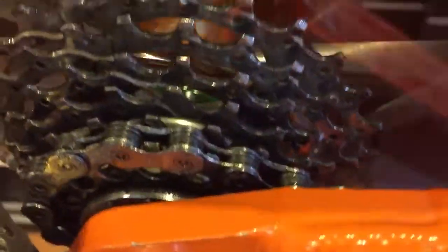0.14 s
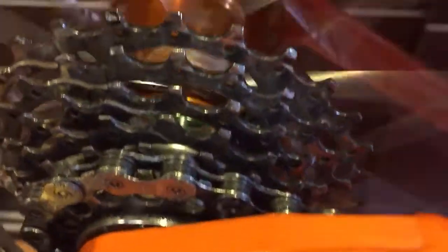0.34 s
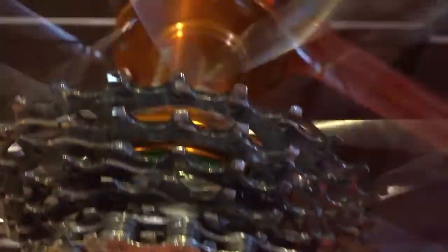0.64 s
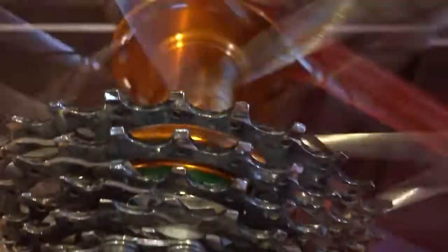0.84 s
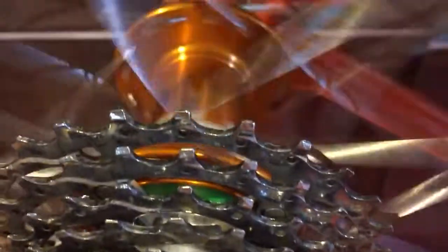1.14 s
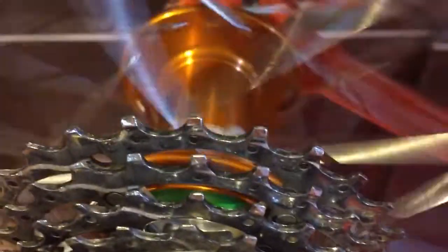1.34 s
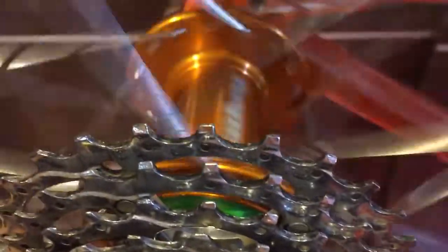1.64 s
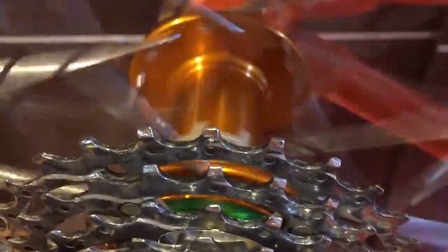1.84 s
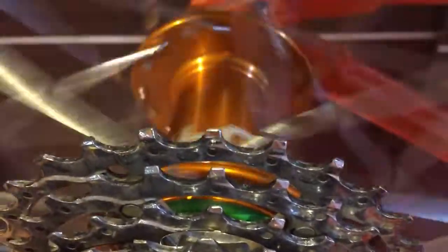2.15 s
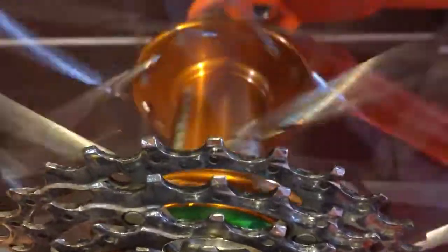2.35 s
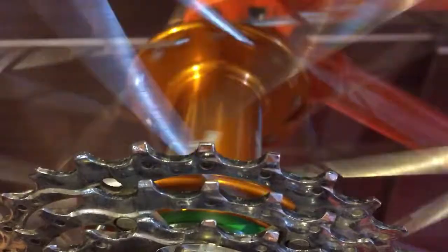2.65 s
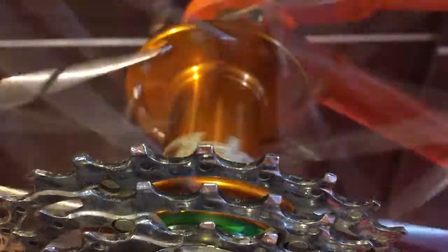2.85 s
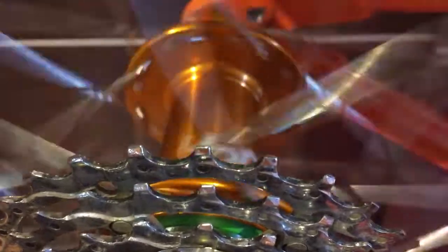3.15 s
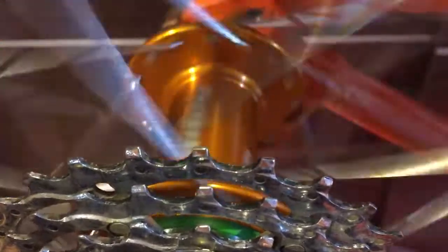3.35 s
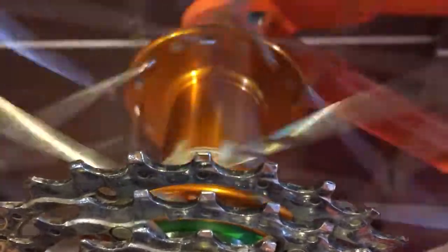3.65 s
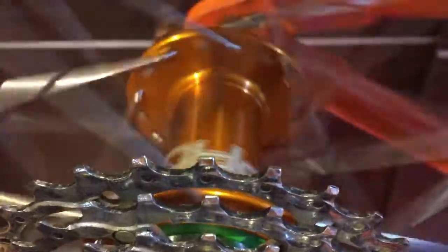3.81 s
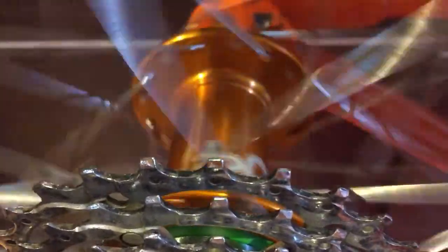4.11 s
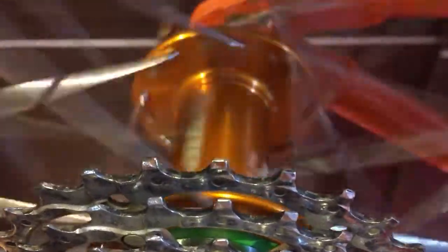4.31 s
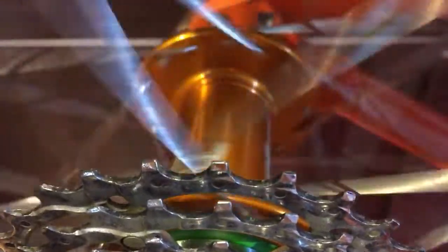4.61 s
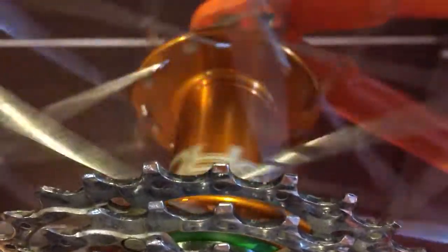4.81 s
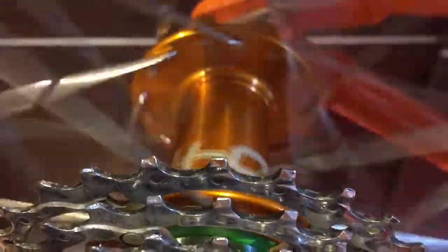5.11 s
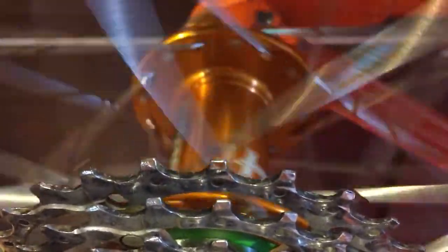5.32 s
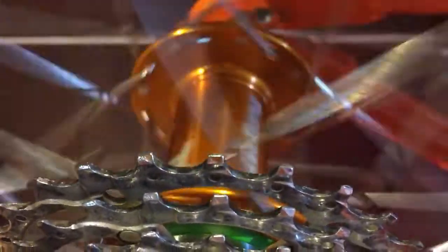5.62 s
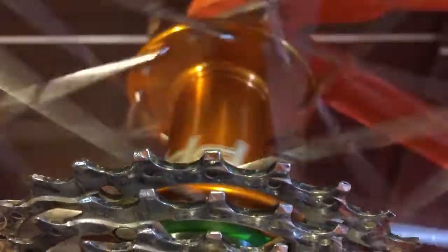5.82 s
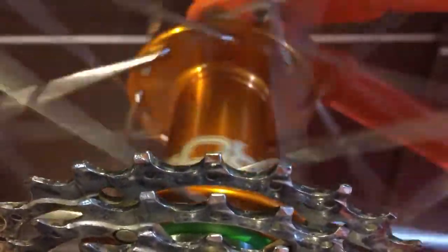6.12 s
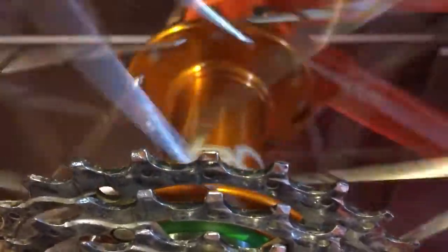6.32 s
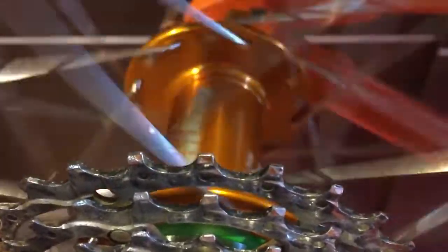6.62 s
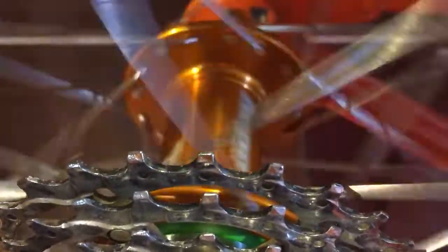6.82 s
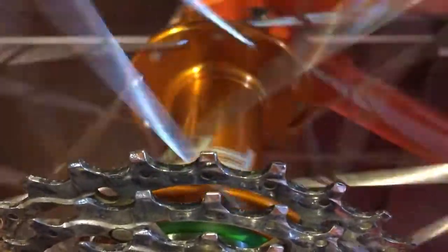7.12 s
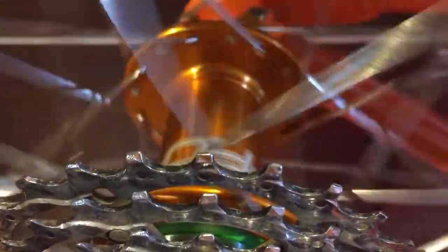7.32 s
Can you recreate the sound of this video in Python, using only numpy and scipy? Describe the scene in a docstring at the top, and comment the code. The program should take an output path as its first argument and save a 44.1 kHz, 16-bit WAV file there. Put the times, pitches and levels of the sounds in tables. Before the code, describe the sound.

Heard very close to the hub indoors, a bicycle rear wheel coasts freely. Sharp, bright ratchet clicks come in uneven pairs, so fast they fuse into a raspy metallic buzz. The rate sinks smoothly to a little over half, making the buzz lower and more granular, while loudness stays nearly steady. Thin metallic ringing and a light low thump accompany the clicks; tone ripples with each wheel turn. It is still ticking at the end.

```python
"""Coasting bicycle wheel

A bicycle rear wheel coasts and slows down, heard from close to the hub, indoors. Two pairs of pawls drop
off a ring of 44 teeth, one pair a little after the other. Each drop is a click: filtered noise bursts make
its crack, resonators ring axle and spokes, and low filters thump the frame. The pattern repeats with
every turn of the wheel, over a faint dull noise."""
import sys
import numpy as np
from scipy import signal
from scipy.fft import rfft, irfft
from scipy.io import wavfile
from scipy.ndimage import uniform_filter1d

SR = 44100
rng = np.random.default_rng(int(sys.argv[2]) if len(sys.argv) > 2 else 0)


def inscribe(sig):
    """Save sig as 16-bit PCM at rate SR to the path in sys.argv[1].

    A 1-D sig is mono; a 2-D sig holds one channel per row.
    Samples are clipped to [-1, 1] before scaling.
    """
    pcm = np.round(np.clip(np.atleast_2d(sig).T, -1, 1) * 32767)
    wavfile.write(sys.argv[1], SR, pcm.astype(np.int16))


N = 328986  # length in samples
TEETH = 44  # teeth in one turn of the wheel


def from_db(db):
    """Level in dB as an amplitude factor."""
    return 10 ** (np.asarray(db) / 20)


def rms_one(x):
    """Scale to an RMS of 1."""
    return x / np.sqrt(np.mean(x ** 2) + 1e-20)


def at_hz(points, hz, axis=1):
    """Read a column of a table at a frequency, interpolating along log frequency."""
    points = np.array(points)
    return np.interp(np.log(hz), np.log(points[:, 0]), points[:, axis])


def passed_by(x, hz, kind, order=2):
    """Butterworth filter; the tiny offset keeps it clear of denormal numbers."""
    return signal.sosfilt(signal.butter(order, hz, kind, fs=SR, output="sos"), x + 1e-18)


def add(track, s, size):
    """Clicks at the given times; those outside are dropped."""
    at = np.round(s * SR).astype(int)
    inside = (at >= 0) & (at < N)
    np.add.at(track, at[inside], size[inside])


def ring(clicks, hz, t60):
    """A two-pole resonator: a unit click sets a sine of starting height 1 ringing, then dying away."""
    radius = from_db(-60 / (t60 * SR))
    step = 2 * np.pi * hz / SR
    return signal.lfilter([0, np.sin(step)], [1, -2 * radius * np.cos(step), radius ** 2], clicks + 1e-18)


def dying_noise(clicks, noise, t60):
    """Noise whose power jumps at each click and then dies away."""
    power_decay = from_db(-120 / (t60 * SR))
    power = signal.lfilter([1], [1, -power_decay], clicks ** 2 + 1e-18)
    return noise * np.sqrt(power)


def colour(x, spectrum, size=4096):
    """Causal filter with the given spectrum (minimum phase, by folding the cepstrum)."""
    hz = np.maximum(np.arange(size // 2 + 1) * SR / size, 1)
    cepstrum = irfft(np.log(from_db(at_hz(spectrum, hz))))
    cepstrum[1:size // 2] *= 2
    cepstrum[size // 2 + 1:] = 0
    response = irfft(np.exp(rfft(cepstrum)))
    return signal.fftconvolve(x, response)[:N]


# The slowing wheel: teeth per s at the start, bearing friction in teeth per s^2,
# drag as the share of the speed lost per s
START_SPEED, FRICTION, DRAG = 58.01806, 2.417697, .02185024
EARLY_S = .00025  # every drop is placed this much earlier
# Heavy spot on the rim. Cosine part, then sine part, of how far it carries the wheel ahead once a turn,
# in teeth at 40 teeth per s.
HEAVY_SPOT = (.0066, .038)
# Pawl pairs on a ring slightly off centre. Each row: offset, cosine and sine part of the shift once a turn,
# cosine and sine part of the shift twice a turn, all in teeth; a positive shift makes the drop earlier.
PAWL_PAIRS = [(2.0745, -.0033, .0093, .0042, .0024), (2.4705, .0084, -.0044, -.0037, -.0041)]
# The second pawl of each pair. Each row: mean lag in teeth, swing of the lag over a turn in teeth,
# tooth of most lag, random scatter in teeth, level in dB against the first pawl.
SECOND_PAWLS = [(-.004, .016, 5.0, .004, -6.0), (-.004, .014, 30.0, .004, -6.0)]


def drops():
    """Friction and drag slow the wheel; gives tooth numbers, each pair's two drop times and the speed."""
    t = np.arange(N + SR // 10) / SR
    speed = (START_SPEED + FRICTION / DRAG) * np.exp(-DRAG * t) - FRICTION / DRAG
    passed = np.cumsum(speed) / SR  # teeth gone by
    tooth = np.arange(-2, int(passed[-1]) - 2)
    angle = 2 * np.pi * tooth / TEETH
    waves = np.array([np.cos(angle), np.sin(angle), np.cos(2 * angle), np.sin(2 * angle)])
    times = []
    for (offset, *off_centre), (lag, swing, most, scatter, _) in zip(PAWL_PAIRS, SECOND_PAWLS):
        # the slower the wheel, the more gravity on the heavy spot sways its speed
        slowness = 40 / np.interp(tooth + offset, passed, speed)
        sway = slowness ** 2 * (HEAVY_SPOT @ waves[:2])
        first = tooth + offset - sway - off_centre @ waves
        second = first + lag + swing * np.cos(angle - 2 * np.pi * most / TEETH)
        second = second + scatter * rng.standard_normal(len(tooth))
        times.append(np.interp([first, second], passed, t) - EARLY_S)
    return tooth, times, speed[:N]


def strikes(times, pair_db):
    """One click track from both pawls of both pairs; pair_db holds a level for every tooth and pair."""
    track = np.zeros(N)
    for (first, second), pawl, db in zip(times, SECOND_PAWLS, pair_db):
        add(track, first, from_db(db))
        add(track, second, from_db(db + pawl[-1]))
    return track


AIR_HZ, AIR_DB = 140, -62.5  # low-pass corner, RMS level


def air():
    """A faint dull noise under everything: low-passed white noise."""
    return from_db(AIR_DB) * rms_one(passed_by(rng.standard_normal(N), AIR_HZ, "low"))


# Weak angles, each met twice a turn: the thump of pair 1, the thump of pair 2, the axle ring of pair 2.
# Each row: tooth, width in teeth, dip in dB.
THUMP_1_WEAK_ANGLES = [(11.1, 1.6, -9), (21.5, 1.2, -2)]
THUMP_2_WEAK_ANGLES = [(11.5, 2.2, -4.5), (21.8, 2.2, -5)]
AXLE_WEAK_ANGLES = [(9.7, 1.15, -15), (1.9, 1.8, -8)]


def around(tooth):
    """Level in dB of both thumps and the axle ring at each tooth: a bell-shaped dip at every weak angle."""
    half, levels = TEETH / 2, []
    for dips in (THUMP_1_WEAK_ANGLES, THUMP_2_WEAK_ANGLES, AXLE_WEAK_ANGLES):
        at, width, dip_db = np.transpose(dips)
        apart = (tooth[:, None] - at + half / 2) % half - half / 2
        levels.append(np.exp(-.5 * (apart / width) ** 2) @ dip_db)
    return levels


# Mix levels of the frame layers, before scene() evens them out over the speed
THUMP_DB, KNOCK_DB, AXLE_DB = -49, -57.5, -51.5
THUMP_LOW_HZ, THUMP_HIGH_HZ, THUMP_DELAY_S = 57, 293, 0.0014
KNOCK_HIGH_HZ = 680
THUMP_SCATTER_DB, KNOCK_SCATTER_DB, AXLE_SCATTER_DB = 1.6, 2.6, 1.0
AXLE_FIRST_PAIR_DB = -12.5  # added to pair 1's thump level for its blow on the axle
# Axle modes. Each row: frequency in Hz, relative level in dB, t60 in seconds.
AXLE_MODES = [(884, 4, 0.026), (1115, 6.5, .045), (1211, 9, 0.025)]


def frame(tooth, times):
    """A low thump and knock through the frame and a ring of the axle; all fade at some wheel angles."""
    scatter_db = np.array([[THUMP_SCATTER_DB], [THUMP_SCATTER_DB], [AXLE_SCATTER_DB]])
    thump_1, thump_2, axle_2 = around(tooth) + scatter_db * rng.standard_normal((3, len(tooth)))
    late = np.array(times) + THUMP_DELAY_S
    thump = passed_by(strikes(late, [thump_1, thump_2 - 1.5]), THUMP_HIGH_HZ, "low", order=3)
    thump = passed_by(thump, THUMP_LOW_HZ, "high")

    # harder thumps are also brighter: a sharper knock on top swings more widely in level
    knock_db = 1.5 * np.array([thump_1, thump_2])
    knock_db += KNOCK_SCATTER_DB * rng.standard_normal((2, len(tooth)))
    knock = passed_by(strikes(late, knock_db), KNOCK_HIGH_HZ, "low", order=3)
    knock = passed_by(knock, 154, "high", order=1)

    together = [(first, first) for first, _ in times]  # the axle feels each pair as one blow
    blows = strikes(together, [thump_1 + AXLE_FIRST_PAIR_DB, axle_2])
    axle = np.zeros(N)
    for k, (hz, db, t60) in enumerate(AXLE_MODES):
        axle += (-1) ** k * from_db(db) * ring(blows, hz, t60)  # neighbours in opposite polarity
    axle = passed_by(axle, [850, 1400], "band", order=1)

    out = from_db(THUMP_DB) * rms_one(thump)
    out += from_db(KNOCK_DB) * rms_one(knock)
    return out + from_db(AXLE_DB) * rms_one(axle)


SPOKE_SCATTER_DB = 2.46
SWELL_TOOTH, SWELL_SHARPNESS = 41.0, 2.4  # tooth where the swell peaks, narrowness of the peak
# Spoke and rim modes. Each row: frequency in Hz, relative level in dB, t60 in seconds,
# once-a-turn swell in dB at the slowest speed (negative dips).
SPOKE_MODES = [(2026, -7.5, 0.083, 10.5), (2048, -4.5, 0.11, -14.5), (2119, -2, 0.099, -5.5),
               (2212, 5.5, 0.03, 7.5), (2333, -0.5, 0.058, 15), (2467, -10.5, 0.035, -13),
               (2583, -10.5, 0.042, 33), (2777, -4, 0.096, -23), (2873, -5.5, 0.09, 8.5),
               (3000, 3.5, 0.026, 1), (3130, -10.5, 0.017, -4.5)]


def spokes(tooth, times, speed):
    """Each drop strikes every mode; they swell or dip at one angle of the wheel, more so as it slows."""
    facing = np.exp(SWELL_SHARPNESS * (np.cos(2 * np.pi * (tooth - SWELL_TOOTH) / TEETH) - 1))
    speed_at_drop = np.interp(times[0][0], np.arange(N) / SR, speed)
    facing *= (speed.min() / speed_at_drop) ** 2.8
    out = np.zeros(N)
    for k, (hz, db, t60, swell_db) in enumerate(SPOKE_MODES):
        scatter_db = SPOKE_SCATTER_DB * rng.standard_normal((2, len(tooth)))
        blows = strikes(times, db + swell_db * facing + scatter_db)
        out += (-1) ** (k // 3) * ring(blows, hz, t60)  # polarity flips every three modes
    return rms_one(passed_by(out, 1950, "high", order=2))


RATTLE_T60_S, RATTLE_DB = 0.0043, -15.5  # level against the bare click
ROOM_T60_S, ROOM_DB = 0.14, -39.5  # level against the bare click
SCATTER_DB = 0.86  # random level of each drop, separate in every band
DRIFT_DB = .6  # the strength also wanders slowly, over about eight teeth
# The hub shell turns towards and away. Each row: frequency in Hz, swing in dB and loudest tooth of pair 1,
# swing in dB and loudest tooth of pair 2.
HUB_FACING = [(3670, 0.78, 23.8, 0.72, 27.4), (6700, 2.8, 34.3, 3.6, 19), (8700, 0.58, 24.4, 0.4, 35),
              (12000, 0.11, 3.9, 0.2, 28)]
# Tone of pair 2 against pair 1. Each row: frequency in Hz, level in dB.
SECOND_PAIR_TONE = [(2000, 7), (3400, 6), (6000, 2), (8800, 7.5), (11000, 0.5), (13500, 13), (15500, -51)]
# Dense ringing after a crack. Each row: frequency in Hz, t60 in seconds, level in dB against the bare click.
METAL_RINGING = [(1520, 0.14, -27), (2900, 0.084, -16.5), (5560, 0.021, -31.5), (10200, 0.044, -3),
                 (14800, 0.013, -59.5)]
# Colour of the crack. Each row: frequency in Hz, relative level in dB per Hz.
METAL_COLOUR = [(500, -36.5), (800, -29), (1350, -24), (1600, -13.5), (1850, -12), (2200, -15),
                (2900, -6.5), (3400, -8), (4500, -7.5), (5000, -13.5), (5400, -3), (6900, -4.5),
                (7600, -7.5), (9200, -7.5), (9900, -13.5), (14500, -12.5), (15400, -6), (15800, -16),
                (15950, -60), (16600, -65)]


def cracks(tooth, times, second_db):
    """Band by band: the bare click, a short rattle, the ringing of the metal and the room."""
    out, edges = np.zeros(N), np.geomspace(500, 18000, 13)
    noise = rng.standard_normal((2, 3, N))  # two sets, so that neighbouring bands differ
    drift_db = DRIFT_DB * rms_one(uniform_filter1d(rng.standard_normal(len(tooth)), size=8))
    for k, (low, high) in enumerate(zip(edges, edges[1:])):
        hz = np.sqrt(low * high)
        pair_db = SCATTER_DB * rng.standard_normal((2, len(tooth)))
        pair_db += drift_db
        for pair in (0, 1):
            swing_db = at_hz(HUB_FACING, hz, axis=1 + 2 * pair)
            loudest = at_hz(HUB_FACING, hz, axis=2 + 2 * pair)
            pair_db[pair] += swing_db * np.cos(2 * np.pi * (tooth - loudest) / TEETH)
        pair_db[1] += at_hz(SECOND_PAIR_TONE, hz) + second_db
        clicks = strikes(times, pair_db)

        rattle, ringing, room = noise[k % 2]
        ringing_t60, ringing_db = at_hz(METAL_RINGING, hz), at_hz(METAL_RINGING, hz, axis=2)
        sound = clicks + from_db(RATTLE_DB) * dying_noise(clicks, rattle, RATTLE_T60_S)
        sound += from_db(ringing_db) * dying_noise(clicks, ringing, ringing_t60)
        sound += from_db(ROOM_DB) * dying_noise(clicks, room, ROOM_T60_S)
        band = passed_by(sound, [low, high], "band", order=1)
        out += rms_one(band) * np.sqrt(high - low)  # even level per Hz
    return rms_one(colour(out, METAL_COLOUR))


SPOKE_DB = 1  # added to the spoke ring column below
# Loudness of the buzz, before it is evened out over the speed. Each row: time in seconds, crack level in dB,
# spoke ring level in dB before SPOKE_DB, pair 2 against pair 1 in dB (cracks only, on top of its tone).
BUZZ_LOUDNESS = [(0, -24, -35, -6.5), (2.5, -24, -34, -7.5), (5, -25, -34, -6), (7.46, -25, -36.5, -8.5)]


def scene():
    """The same drops drive frame, spokes and cracks, mixed over the air noise."""
    tooth, times, speed = drops()
    s, crack_db, spoke_db, second_db = np.transpose(BUZZ_LOUDNESS)
    t = np.arange(N) / SR
    second_pair_db = np.interp(times[1][0], s, second_db)
    wheel = frame(tooth, times)
    wheel += from_db(np.interp(t, s, spoke_db) + SPOKE_DB) * spokes(tooth, times, speed)
    wheel += from_db(np.interp(t, s, crack_db)) * cracks(tooth, times, second_pair_db)
    # evens out the loudness that comes from more drops a second
    denser = np.sqrt(speed / speed.mean())
    return (wheel / denser + air())[None]


PEAK = .8  # ceiling of the rounding
CUTOFF_HZ = 16600


def record(dry):
    """Peaks are rounded by a tanh curve; the deep bass and the top are cut."""
    rounded = PEAK * np.tanh(passed_by(dry, 32, "high", order=4) / PEAK)
    return signal.sosfilt(signal.ellip(10, .2, 70, CUTOFF_HZ, fs=SR, output="sos"), rounded)


dry = scene()
out = record(dry)
inscribe(out)
```